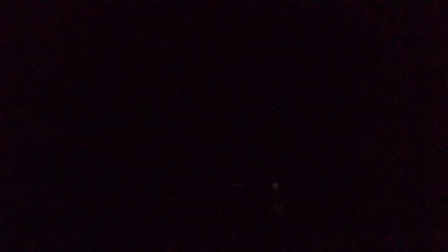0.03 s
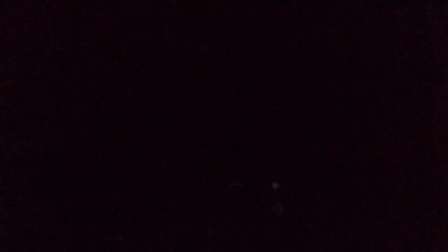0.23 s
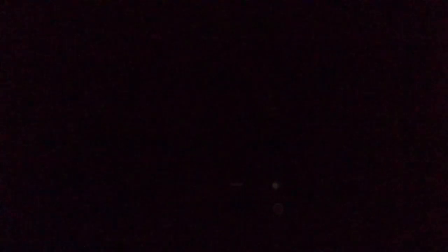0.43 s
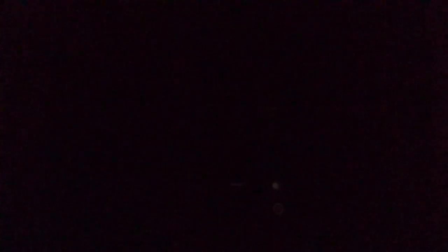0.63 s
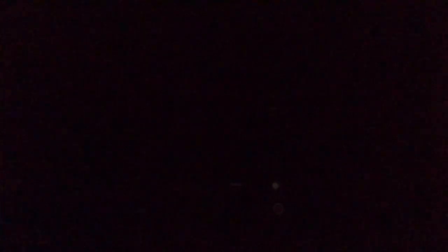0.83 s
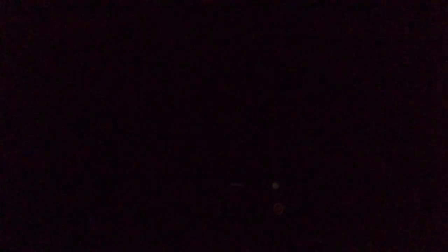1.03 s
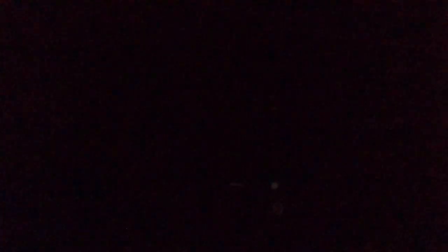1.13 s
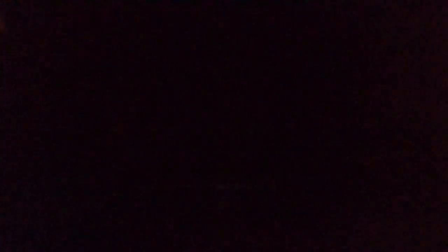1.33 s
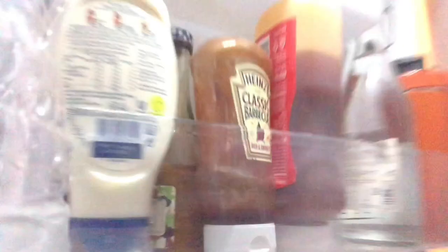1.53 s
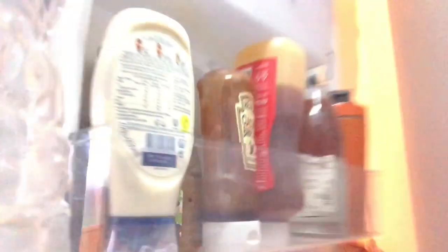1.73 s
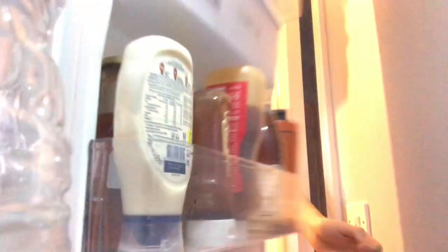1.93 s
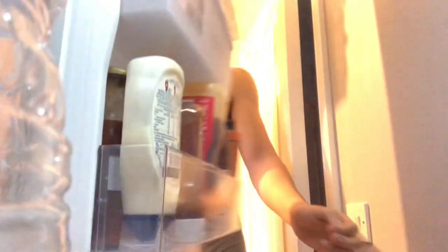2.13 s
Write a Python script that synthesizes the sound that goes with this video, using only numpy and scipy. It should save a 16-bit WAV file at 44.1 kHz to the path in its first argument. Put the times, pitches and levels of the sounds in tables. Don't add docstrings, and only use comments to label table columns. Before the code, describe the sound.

From inside a closed fridge in a home kitchen, a quiet motor hum, then the door pops open with a close, heavy plastic clunk and clinks, brief room air, and a dull chattering knock at the end.

```python
import sys
import numpy as np
from scipy import signal
from scipy.fft import rfft, irfft
from scipy.io import wavfile
from scipy.ndimage import uniform_filter1d

SR = 44100
rng = np.random.default_rng(int(sys.argv[2]) if len(sys.argv) > 2 else 0)


def to_wav(sig):
    pcm = np.clip(np.atleast_2d(sig), -1, 1) * 32767
    pcm = np.round(pcm).astype(np.int16)
    wavfile.write(sys.argv[1], SR, pcm.T)


def rack_gain(trim_db):
    fader = np.asarray(trim_db, float)
    return 10 ** (fader / 20)


N = 95961
T = np.arange(N) / SR


def unit(x):
    return x / np.sqrt(np.mean(x ** 2))


def colour(x, table):
    hz, db = np.array(table).T
    f = np.arange(N // 2 + 1) * SR / N + 1
    gain = rack_gain(np.interp(np.log(f), np.log(hz), db))
    return unit(irfft(rfft(x) * gain, N))


def noise(table):
    return colour(rng.standard_normal(N), table)


def tone(hz, start_s=0, turns=0):
    return np.sin(2 * np.pi * (hz * (T - start_s) + turns))


def ring(x, modes):
    out = np.zeros(N)
    for hz, db, t60_s in modes:
        pole = np.exp((2j * np.pi * hz - np.log(1000) / max(t60_s, .005)) / SR)
        out += rack_gain(db) * signal.lfilter([1], [1, -pole], x).imag
    return out


def add_push(x, start_s, db, ms):
    push = np.hanning(max(int(ms * SR / 1000), 1) + 2)[1:-1]
    i = int(start_s * SR)
    x[i:i + len(push)] += rack_gain(db) * push / push.sum()


def struck(blows, modes):
    blow_spread_db = 1.5
    spread = rng.standard_normal((len(blows), len(modes)))
    out = np.zeros(N)
    for k, mode in enumerate(modes):
        force = np.zeros(N)
        for (s, db, ms), r in zip(blows, spread[:, k]):
            add_push(force, s, db + blow_spread_db * r, ms)
        out += ring(force, [mode])
    return out


def shape(start_s, rise_s, hold_s, t60_s):
    rise = np.clip((T - start_s) / max(rise_s, 1e-4), 0, 1) ** 2
    return rise * rack_gain(-60 * np.maximum(T - start_s - rise_s - hold_s, 0) / t60_s)


def walk(rate_hz):
    k = int(SR / rate_hz)
    return unit(uniform_filter1d(uniform_filter1d(rng.standard_normal(N), k), k))


# time in s, mains line in dB, double line in dB.
HUM_LEVELS = [(.08, -44.5, -39), (0.599, -42.5, -39.5), (.66, -47.5, -46), (1.17, -50, -54.5),
              (1.6, -58.5, -46), (1.69, -51.5, -46.5), (1.831, -64, -42), (2.001, -63, -45.5),
              (2.18, -65.5, -52.5)]
HUM_PHASE_TURNS = (0.21, 0.69)


def compressor():
    mains_hz, unsteady_db, unsteady_hz = 50, 0.13, 6
    s, *lines = np.array(HUM_LEVELS).T
    out = np.zeros(N)
    for k, db in enumerate(lines):
        level = rack_gain(np.interp(T, s, db) + unsteady_db * walk(unsteady_hz))
        out += np.sqrt(2) * level * tone((k + 1) * mains_hz, turns=HUM_PHASE_TURNS[k])
    return out


# frequency in Hz, density in dB per Hz.
INSIDE_AIR = [(60, -7), (170, 4), (350, -1), (700, -11.5), (900, -5.5), (2500, -21), (3700, -17),
              (16000, -37.5)]
# frequency in Hz, density in dB per Hz.
KITCHEN_AIR = [(80, -8.5), (250, 5.5), (600, -7.5), (1200, -10.5), (2500, -27), (16000, -46)]


def air():
    inside_db, kitchen_db = -59.5, -47.5
    open_s, settle_db, settle_s = 1.32, -13.5, 0.39
    settle = settle_db * (1 - np.exp(-np.maximum(T - open_s, 0) / settle_s))
    inside = noise(INSIDE_AIR) * rack_gain(inside_db + walk(2.1))
    kitchen = noise(KITCHEN_AIR) * rack_gain(kitchen_db + settle + 2 * walk(42))
    return inside + kitchen * (T > open_s)


# frequency in Hz, level in dB, t60 in s.
LINER_MODES = [(323, -1, 0.027), (365, -7.5, 0.047), (404, -9, 0.09), (504, 3.5, 0.067), (568, -0.5, 0.04),
               (615.4, -8.5, 0.14), (687, -10.5, 0.023), (813, -7.5, 0.2), (941, -2, 0.054),
               (1110, -7, 0.061), (1245, -6.5, 0.073), (1410, -13, 0.049), (480, 1, 0.0034)]
# start in s, level in dB, push in ms.
LINER_KNOCKS = [(.602, -45.5, 1.1), (.808, -52.5, 0.99), (1.1155, -38.5, 0.12), (1.122, -45, 0.49),
                (1.1712, -30, 0.57), (1.2625, -16, 0.48), (1.278, -15.5, 0.5), (1.2905, -13.5, 0.65),
                (1.3, -22.5, 1.6), (1.312, -24, 0.92), (1.322, -19.5, 0.92), (1.369, -35, 0.23),
                (1.377, -33, 0.66), (1.416, -23.5, 0.16), (1.424, -26, 0.23), (1.4365, -20, 1.02),
                (1.451, -26, 0.96), (1.465, -22, 2)]


def liner():
    return rack_gain(-3.5) * struck(LINER_KNOCKS, LINER_MODES)


# frequency in Hz, level in dB, t60 in s.
CABINET_MODES = [(80.9, -3.5, 0.208), (128.7, -14, 0.18), (157.1, 3, 0.16), (211.6, -4.5, 0.19),
                 (307, 2.5, 0.055)]
# start in s, level in dB, push in ms.
CABINET_JOLTS = [(.606, -40, 4.7), (.65, -45.5, 4), (.81, -47.5, 1), (1.115, -34, 3.8), (1.245, -30, 1.9),
                 (1.3, -9.5, 5.8), (1.33, -12, 12), (1.41, -18.5, 4.3), (1.44, -18.5, 3.17),
                 (1.465, -29, 7.1), (1.5, -29.5, 6.3), (1.575, -35.5, 7.7)]
# frequency in Hz, level in dB, t60 in s.
SWAY_MODES = [(59.6, 4.5, 0.19)]
# start in s, level in dB, push in ms.
SWAY_PUSHES = [
    (.61, -28, 7.4),
    (.674, -50, 11),
    (.82, -41.5, 7.3),
    (1.24, -37, 4.9),
    (1.283, -5, 17.7),
    (1.322, -14.5, 9.5),
    (1.355, -10, 23),
    (1.455, -25.5, 7.4),
]


def cabinet():
    return struck(CABINET_JOLTS, CABINET_MODES) + struck(SWAY_PUSHES, SWAY_MODES)


def smear(x):
    n, t60_s = SR // 50, .012
    return signal.fftconvolve(x, rng.standard_normal(n) * rack_gain(-60 * T[:n] / t60_s))[:N]


# start in s, rise in ms, hold in ms, hiss in dB, body in dB.
SCRAPE_BURSTS = [(.803, 5, 6.3, -59.5, -50), (0.761, 34, 170, -68.5, -65.5), (1.057, 0.3, 26, -58, -53.5),
                 (1.085, 13, 32, -73, -69), (1.1139, 1.3, 8.6, -55.5, -39), (1.128, 3.9, 25, -63, -58),
                 (1.18, 5, 33, -66, -50), (1.156, 0.3, 3.3, -49, -44), (1.165, 0.83, 2.6, -52, -53),
                 (1.218, 8, 23, -53.5, -35), (1.241, 9, 4.2, -45.5, -30.5), (1.251, 4.9, 12, -29.5, -18),
                 (1.26, 2, 7.1, -26.5, -21), (1.276, 1.8, 7, -28, -20), (1.289, 2, 4, -35.5, -26),
                 (1.297, 8.6, 12, -39.5, -26), (1.316, 2, 5.7, -42, -24.5), (1.366, 1.3, 10, -33.5, -21.5),
                 (1.387, 3, 14, -54, -32), (1.411, 11.2, 12.2, -29.5, -22), (1.442, 4, 23, -44.5, -35.5),
                 (1.652, 1.05, 7.2, -59, -45), (1.864, 0.89, 8.4, -53, -47.5),
                 (1.904, 0.92, 4.3, -66.5, -50.5), (2.057, 5.7, 8.7, -60, -38), (2.073, 0.95, 15, -56, -51),
                 (2.091, 4.9, 55, -63, -48)]
# frequency in Hz, density in dB per Hz.
HISS_COLOUR = [(900, -28), (1800, 0.5), (2800, -7), (4500, -6.5), (6000, -6.5), (9000, -18), (16000, -22.5)]
# frequency in Hz, density in dB per Hz.
BODY_COLOUR = [(60, -29), (130, -11.5), (220, 1.5), (600, -4), (1200, -13), (2500, -27), (5000, -44.5)]
# start in s, hold in ms, level in dB.
FIZZ_BURSTS = [
    (1.056, 15, -60.5),
    (1.157, 22, -58.5),
    (1.421, 44, -46.5),
    (2.072, 28, -56),
    (2.129, 18, -61),
]
# frequency in Hz, density in dB per Hz.
FIZZ_COLOUR = [(3000, -48.5), (7000, -8.5), (16000, -9.5)]


def scrapes():
    grains_per_s, grain_db, release_t60_s = 9000, 1.5, .055
    hits = rng.random((3, N)) < grains_per_s / SR
    grains = hits * rack_gain(grain_db * rng.exponential(size=(3, N))) * rng.standard_normal((3, N))
    patchy = rack_gain(1.2 * walk(200))
    hiss_grains, body_grains, fizz_grains = [smear(g) for g in grains]

    hiss_level, body_level, fizz_level = np.zeros((3, N))
    for s, rise_ms, hold_ms, hiss_db, body_db in SCRAPE_BURSTS:
        burst = shape(s, rise_ms / 1000, hold_ms / 1000, release_t60_s)
        hiss_level += rack_gain(hiss_db) * burst
        body_level += rack_gain(body_db) * burst
    for s, hold_ms, db in FIZZ_BURSTS:
        fizz_level += rack_gain(db) * shape(s, 0.0012, hold_ms / 1000, release_t60_s)

    bright = colour(hiss_grains, HISS_COLOUR) * hiss_level + colour(fizz_grains, FIZZ_COLOUR) * fizz_level
    body = colour(body_grains, BODY_COLOUR) * body_level
    snap = noise([(1000, -20), (5500, 0), (16000, -12)])
    crack = rack_gain(-14.5) * shape(1.2612, 0.00019, .0028, .016) * snap
    return bright * patchy + body + crack


# frequency in Hz, level in dB, t60 in s.
GLASS_MODES = [(1752, -17, .5), (1788, -9, .4), (3420, -8, .07), (3620, -8, .13), (5276, -2, .06),
               (5345, -17, .3), (8200, -1, .02), (9954, -6, .06), (14090, 4, .03), (13300, -2, .02)]
# start in s, level in dB, push in ms.
GLASS_CLINKS = [
    (1.4212, -28, .02),
    (1.431, -37, .06),
    (1.445, -38, .12),
    (1.467, -42, .3),
]
# start in s, level in dB, frequency in Hz, t60 in s.
CAP_TICKS = [(1.158, -45, 7300, 0.014), (1.169, -46, 7640, 0.022), (1.656, -47, 2450, 0.037),
             (1.655, -53.5, 5160, 0.046), (1.906, -38, 745, 0.034), (1.904, -44, 1700, 0.032),
             (1.908, -51.5, 1197, 0.025), (1.865, -50, 3204, 0.036), (1.865, -54, 3660, 0.068),
             (1.865, -50.5, 5150, 0.029), (1.865, -55, 5920, 0.033), (1.866, -64, 7830, 0.044),
             (1.866, -65, 9900, 0.06), (1.059, -56, 5370, 0.039), (1.115, -43.5, 2400, 0.036),
             (1.114, -72, 9600, 0.026), (1.368, -37, 6060, .05), (1.369, -39.5, 3510, 0.061),
             (2.063, -33.5, 957, 0.048), (2.076, -51, 7960, 0.027), (1.296, -37, 4370, 0.079),
             (1.307, -32, 4350, 0.077), (1.416, -17.5, 1538, 0.018)]


def bottles():
    out = struck(GLASS_CLINKS, GLASS_MODES) * rack_gain(2.5 * walk(250))
    for s, db, hz, t60_s in CAP_TICKS:
        out += rack_gain(db + 2.6 * walk(260)) * shape(s, 0.0014, 0, t60_s) * tone(hz)
    return out


# start in s, level in dB, frequency in Hz, hold in ms, t60 in s.
PANEL_RINGS = [(1.2615, -6.5, 565, 4.2, .04), (1.276, -7.5, 615, 7, .05), (1.3095, -9, 394, 4.8, 0.017),
               (1.271, -14, 165, 29, 0.033), (1.185, -41, 160, 30, .06), (1.4235, -14, 620, 3, 0.052),
               (1.314, -8, 559, 6.8, 0.024), (1.261, -22.5, 2116, 6, .07), (1.255, -19.5, 1090, 10, .05),
               (1.318, -19.5, 960, 7, 0.039), (1.368, -22, 1020, 8.6, 0.022), (1.369, -27.5, 635, 11, 0.11),
               (1.368, -30, 2300, 5.4, 0.03), (1.115, -34, 1190, 5, 0.027), (1.116, -37, 495, 5.9, 0.028)]


def panel():
    out = np.zeros(N)
    for s, db, hz, hold_ms, t60_s in PANEL_RINGS:
        level = rack_gain(db + 0.73 * walk(150))
        out += level * shape(s, 0.0013, hold_ms / 1000, t60_s) * tone(hz, s)
    return out


# start in s, hold in s, frequency in Hz, level in dB.
HINGE_GROANS = [
    (1.51, .07, 481, -50),
    (1.62, .16, 452, -56),
    (1.59, .13, 1062, -61),
    (1.64, .09, 222, -56),
]


def hinge():
    out = np.zeros(N)
    for s, hold_s, hz, db in HINGE_GROANS:
        level = rack_gain(db + 2 * walk(45))
        wavering_hz = hz * (1 + .004 * walk(23))
        groan = np.sin(2 * np.pi * np.cumsum(wavering_hz) / SR)
        out += level * shape(s, 0.011, hold_s, 0.12) * groan
    return out


# frequency in Hz, level in dB, t60 in s.
STOP_MODES = [(228.8, 6, 0.075), (304, 3, 0.044), (399.5, -1, 0.083), (473, -0.5, 0.059), (620, -9, 0.045),
              (979, -10, 0.064), (1290, -19, .1)]
# start in s, level in dB, push in ms.
STOP_BLOWS = [
    (2.063, -35, 0.95),
    (2.069, -35, 0.32),
    (2.082, -30, 0.8),
    (2.104, -32.5, 0.53),
    (2.111, -32, 0.5),
    (2.123, -30, 1),
    (2.141, -44, 0.94),
    (2.168, -40.5, 0.68),
]


def stop():
    shudder_s, chatter_s = 2.069, 2.061
    shudder = shape(shudder_s, 0.0083, 0.063, 0.11) * tone(95.2, shudder_s, 0.59)
    chatter = shape(chatter_s, .013, 0, 0.027) * tone(252, chatter_s, 0.38)
    return rack_gain(-14) * shudder + rack_gain(-17.5) * chatter + struck(STOP_BLOWS, STOP_MODES)


def cabinet_tail(near):
    tail_db, t60_s, n = -21.5, 0.32, SR // 2
    tail = rng.standard_normal(n) * rack_gain(-60 * T[:n] / t60_s)
    tail = signal.lfilter([1], [1, -.6], tail)
    tail /= np.sqrt(np.sum(tail ** 2))
    return rack_gain(tail_db) * signal.fftconvolve(near, tail)[:N]


def scene():
    near = liner() + scrapes() + panel()
    near = near + cabinet_tail(near)
    return (near + bottles() + cabinet() + compressor() + air() + hinge() + stop())[None]


def roll_off(x):
    return signal.sosfilt(signal.butter(12, 16470, fs=SR, output="sos"), x)


def record(dry):
    mic_hz, top_hz, start_s, fade_s = 36.5, 15800, .0838, 0.00022
    x = signal.sosfilt(signal.butter(4, mic_hz, "high", fs=SR, output="sos"), dry)
    x = np.tanh(.9 * x) / .9
    x = signal.sosfilt(signal.ellip(8, .2, 70, top_hz, fs=SR, output="sos"), x)
    return roll_off(x * np.clip((T - start_s) / fade_s, 0, 1))


dry = scene()
out = record(dry)
to_wav(out)
```